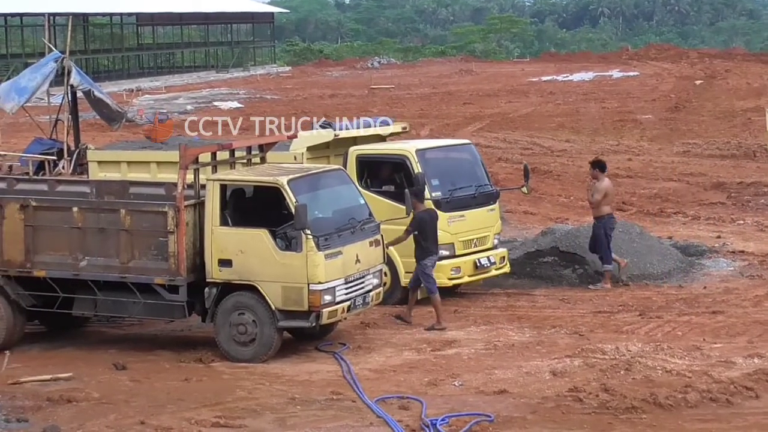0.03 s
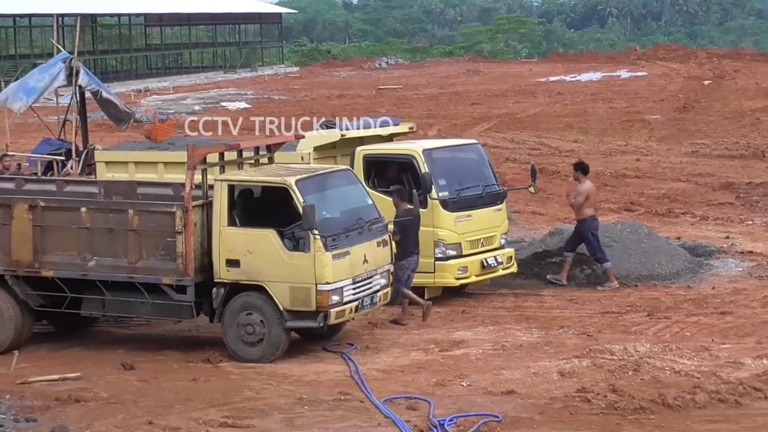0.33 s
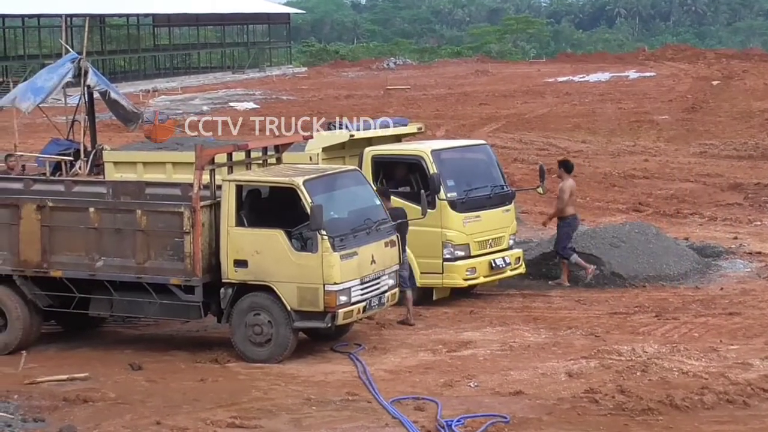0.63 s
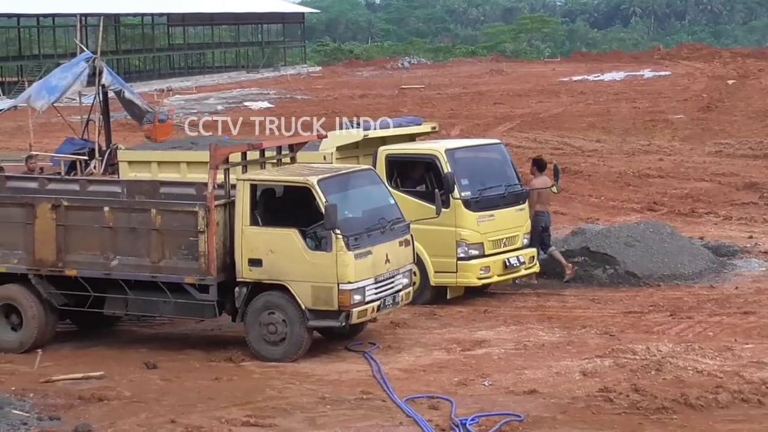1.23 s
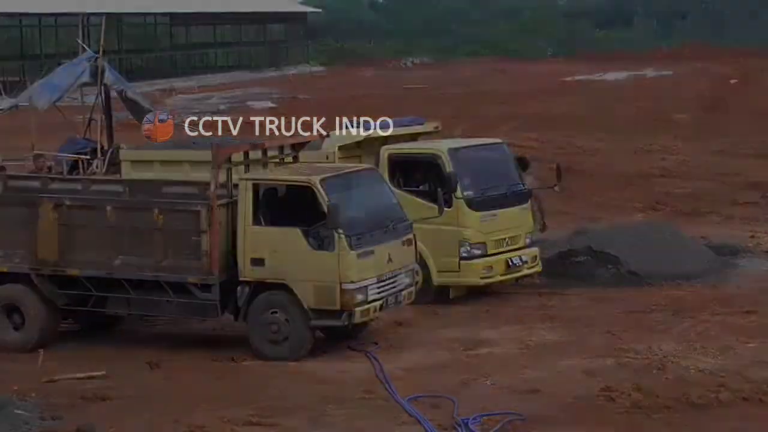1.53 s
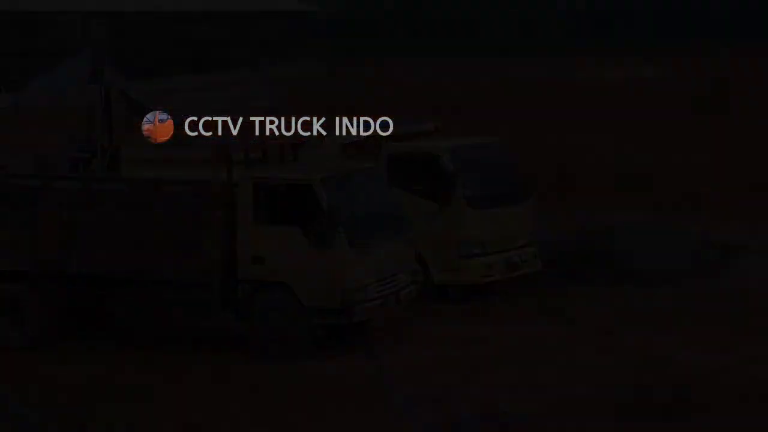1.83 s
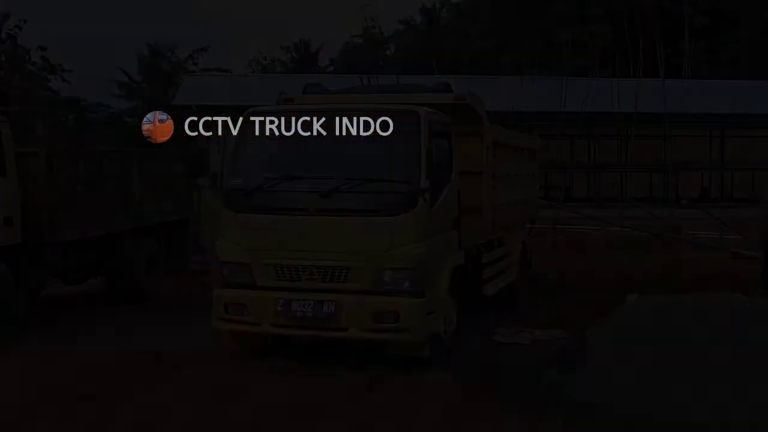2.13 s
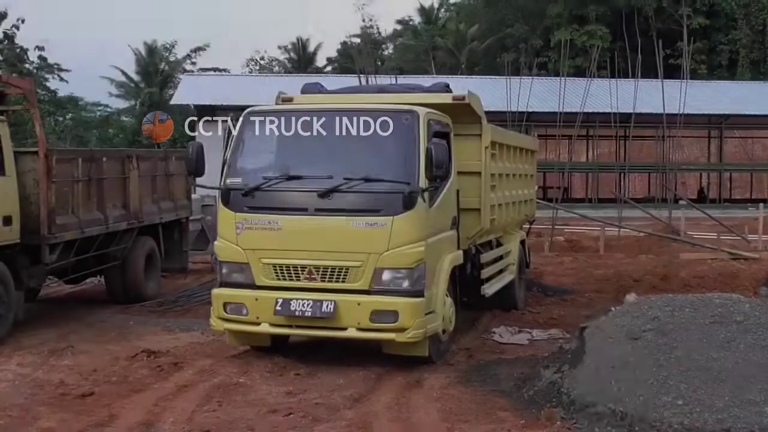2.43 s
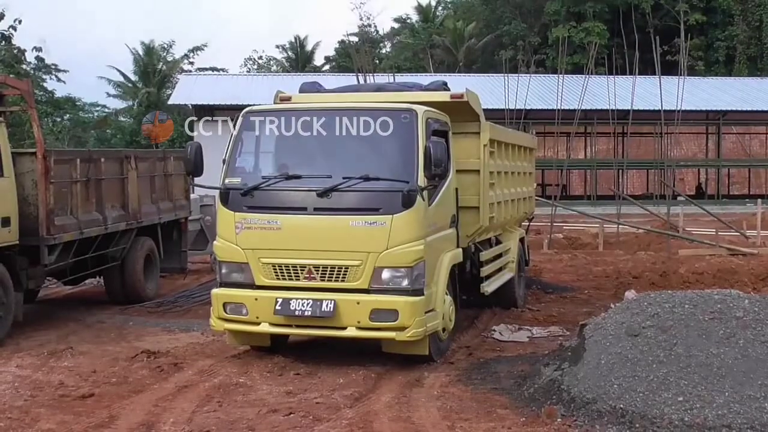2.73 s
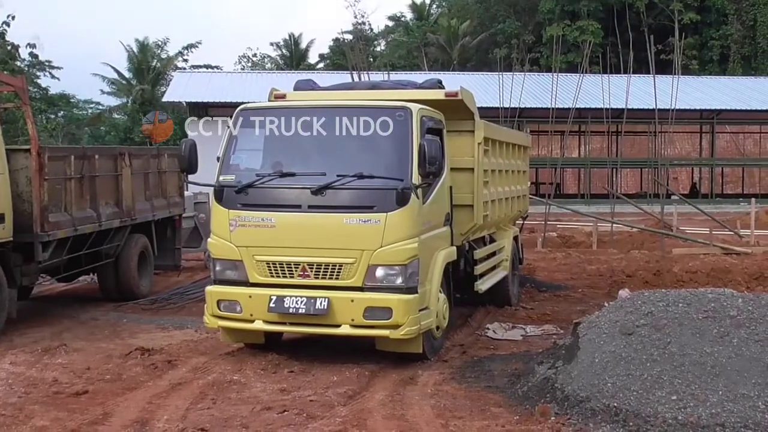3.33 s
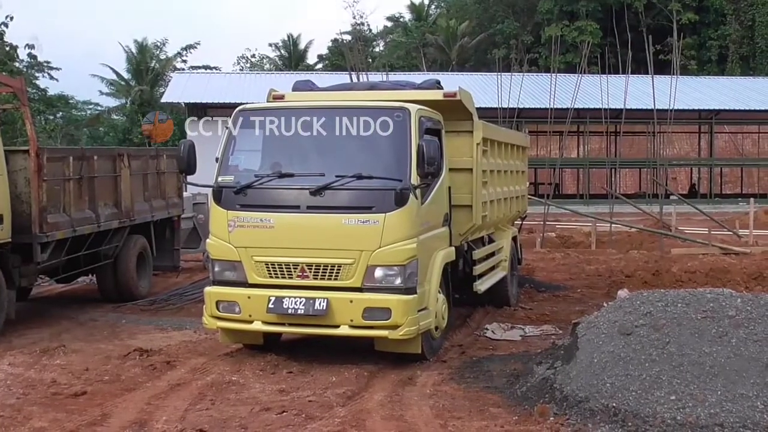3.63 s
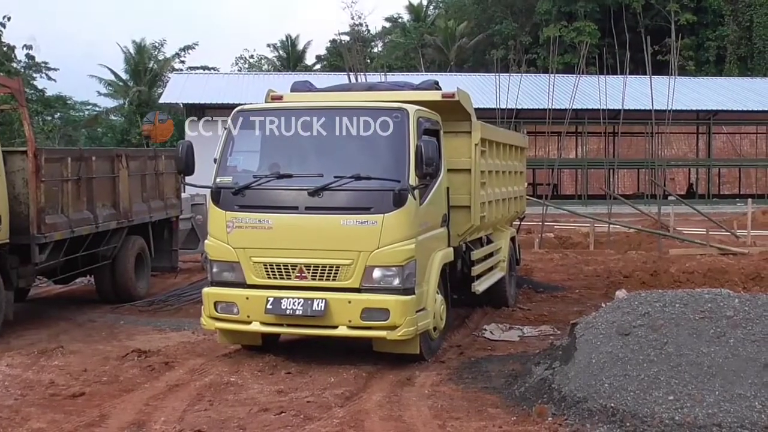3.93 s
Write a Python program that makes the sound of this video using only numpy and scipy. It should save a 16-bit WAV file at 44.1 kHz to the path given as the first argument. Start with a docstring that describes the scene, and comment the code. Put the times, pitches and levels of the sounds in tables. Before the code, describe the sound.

On a building site, a diesel truck rumbles slowly along with clanks from its tipper body and stops with high brake squeaks. A close, ticking idle takes over above another engine's hum, ending with two dull thuds and a faint whine.

```python
"""Dump trucks on a building site

A diesel truck creeps over rough ground: its exhaust booms, sags and recovers, the steel tipper body
knocks and booms, and the brakes squeak as it stops. It fades into a truck idling close by, each firing
a tick and a push of rumble, over the hum of a faster engine. Two dull thuds and a faint whine end it."""
import sys
import numpy as np
from scipy import signal
from scipy.fft import rfft, irfft
from scipy.io import wavfile

SR = 44100
rng = np.random.default_rng(int(sys.argv[2]) if len(sys.argv) > 2 else 0)


def generate_wav(signal):
    """Clip the signal to [-1, 1] and save it as 16-bit WAV at the path in sys.argv[1]."""
    frames = np.transpose(np.atleast_2d(signal))
    scaled = np.clip(frames, -1, 1) * 32767
    pcm = np.round(scaled).astype(np.int16)
    wavfile.write(sys.argv[1], SR, pcm)


N = 176400
T = np.arange(N) / SR
SIDES = np.array([[1], [-1]])  # left, right

# Exhaust boom, at twice the firing rate. Each row: time in seconds, pitch in Hz.
BOOM_PITCH = [(.12, 136.7), (.3, 121.4), (.45, 114.3), (.8, 108), (1.07, 115.1), (1.3, 123.5),
              (1.55, 133.7), (1.9, 136), (2.6, 142.6)]
# Its partials. Each row: multiple of the boom pitch, relative level in dB.
BOOM_ORDERS = [(.5, -23), (1, -0.5), (1.5, -17.5), (2, -14.5), (2.5, -22.5), (3, -20)]
# Fader rides for the creeping truck. Each row: time in seconds, gain in dB.
BOOM_LEVEL = [(0, -19), (.24, -20), (.33, -29.5), (.98, -35.5), (1.07, -22.5), (1.21, -29.5), (1.3, -21),
              (1.65, -21), (1.73, -31), (1.88, -24.5), (2.12, -27.5), (2.35, -35.5), (2.62, -32),
              (2.85, -34.5)]
BODY_LEVEL = [(0, -24.5), (.3, -24), (.8, -21.5), (1.5, -23.5), (1.68, -25.5), (1.73, -29), (2.3, -35)]
CLATTER_LEVEL = [(0, -31), (.5, -27), (.95, -27.5), (1.17, -23), (1.32, -28.5), (1.45, -24.5),
                 (1.68, -27.5), (1.73, -30.5), (2.3, -35)]
HISS_LEVEL = [(0, -40), (.35, -40), (.6, -35), (1.0, -39.5), (1.65, -38), (1.75, -43), (2.3, -46)]
CHASSIS_LEVEL = [(0, -46), (.55, -38), (.85, -28), (1.5, -31), (1.8, -48)]
CREEP_NOISE_FADE = [(2.2, -8.5), (2.5, -10), (2.9, -11)]  # rides all four noise layers
# Colours of those layers. Each row: frequency in Hz, relative noise density in dB.
BODY_COLOUR = [(150, 1.5), (250, -5.5), (345, 0), (450, -8.5), (600, -15)]
CLATTER_COLOUR = [(500, -5), (600, -9), (700, -2.5), (790, 0.5), (1000, -2.5), (1130, -7), (1450, -9),
                  (1710, -21.5), (2200, -18), (3000, -27)]
HISS_COLOUR = [(1500, 7.5), (2400, -2.5), (4000, 3.5), (5500, -2.5), (7000, 1.5), (11000, -1.5),
               (14000, -6)]
CHASSIS_COLOUR = [(35, -38), (55, 6.5), (75, -32), (110, -3), (160, -11.5)]
# Stereo width of each truck. Each row: frequency in Hz, left-right likeness (1 is mono).
CREEP_LIKENESS = [(380, 0.86), (940, 0.58), (5000, 0.053), (8000, -0.25), (13000, -0.057)]
IDLE_LIKENESS = [(300, 0.98), (940, 0.9), (5870, 0.83), (14000, 0.23)]
# Placement of each truck. Each row: frequency in Hz, left minus right in dB.
CREEP_PAN = [(150, 1), (1000, -3.5), (4000, -4), (8000, 0), (13000, -2)]
IDLE_PAN = [(60, 1), (10000, 0.5)]

# Knocks of the tipper body. Each row: start in seconds, clank level in dB, thump level in dB.
KNOCKS = [(0.36, -37, -21), (0.42, -36.5, -25), (0.446, -48, -24.5), (0.535, -24, -22.5),
          (0.656, -26.5, -25), (0.694, -43, -26.5), (0.788, -39, -24), (0.855, -35.5, -25.5),
          (1.396, -40, -24), (1.46, -36, -25.5)]
# Its ringing steel. Each row: frequency in Hz, relative level in dB.
STEEL_MODES = [(1420, -5), (2380, -17), (2800, -9.5), (4200, -12.5)]
# Colours of the knocks and the hiss swell. Each row: frequency in Hz, relative noise density in dB.
CLANK_COLOUR = [(500, -29), (1400, -1), (2000, 1.5), (2700, -2), (3400, 5), (4200, -1), (5500, -3.5),
                (9000, -2), (14000, -9)]
THUMP_COLOUR = [(100, -1.5), (180, -11), (350, 5.5), (600, -8.5), (1000, -11.5), (1800, -20.5)]
SWELL_COLOUR = [(6500, -5), (8000, 5.5), (11500, -5)]
# Hollow booms of the shaken body. Each row: peak time in seconds, pitch in Hz, level in dB.
BODY_BOOMS = [(0.379, 348.5, -24), (0.581, 440, -24.5), (.735, 159.7, -21), (.955, 364.2, -21),
              (1.045, 321.2, -24), (1.17, 330.7, -26), (3.09, 164.4, -22.5), (3.16, 215, -29)]
# Hits on a loose steel part. Each row: start in seconds, level in dB.
PINGS = [(.422, -44.5), (0.692, -43), (.868, -46.5)]
# Spurts of brake squeak. Each row: start in seconds, length in seconds, level in dB.
SQUEAKS = [(1.292, 0.075, -45), (1.33, 0.083, -33), (1.411, 0.078, -36.5), (1.493, 0.09, -35),
           (1.64, 0.029, -41), (1.713, 0.13, -32), (1.864, 0.051, -46), (1.943, 0.081, -39.5),
           (2.066, 0.052, -42), (2.185, .045, -46), (2.26, 0.11, -46), (2.39, 0.081, -55), (2.5, .2, -67)]
# Higher brake modes. Each row: start in seconds, seconds to fall 15 dB, pitch in Hz, level in dB.
CHIRPS = [(1.85, 0.17, 9400, -44), (2.0, 0.16, 11650, -55)]

# Fade-in of the idling truck and the hum. Each row: time in seconds, gain in dB.
IDLE_FADE = [(1.6, -24.5), (2.0, -10), (2.4, -7.5), (2.75, -3.5), (3.05, -1.5), (4, -1.5)]
# Colours of the idle and the thuds. Each row: frequency in Hz, relative noise density in dB.
IDLE_RUMBLE_COLOUR = [(30, -34), (59, -7), (104, -10), (160, -6.5), (225, -2.5), (292, -5), (456, -24),
                      (730, -13.5), (1050, -27.5), (1410, -30), (2300, -57)]
TICK_COLOUR = [(1200, 4.5), (2300, 3.5), (3000, -3), (4000, 2), (5700, -8.5), (8500, 0.5), (11500, -5.5),
               (14000, -9.5)]
THUD_COLOUR = [(130, -2), (400, 2.5), (800, 3.5), (1400, -5.5), (2200, -22.5), (5000, -32), (8500, -27),
               (14000, -37)]
# Ring of the engine block. Each row: frequency in Hz, relative level in dB.
BLOCK_MODES, BLOCK_WIDTH_HZ = [(3400, -13), (4450, -13)], 36
# Tones of the faster engine. Each row: pitch in Hz, level in dB before the fade.
HUM_TONES = [(73.6, -32), (142.5, -27.5), (185, -33.5), (221, -29), (244, -34)]
# Dull blows. Each row: start in seconds, level in dB.
THUDS = [(3.012, -23.5), (3.714, -32.5)]
# Path of the whine. Each row: time in seconds, pitch in Hz, level in dB.
WHINE = [(3.3, 480, -68.5), (3.43, 492, -39), (3.6, 540, -34.5), (3.75, 570, -60)]


def from_db(db):
    """Decibels to gain."""
    return 10 ** (np.asarray(db) / 20)


def rms_one(x):
    """Scale to unit power."""
    return x / np.sqrt(np.mean(x ** 2) + 1e-20)


def in_time(rows, column=1):
    """One column of a curve at every sample."""
    rows = np.array(rows)
    return np.interp(T, rows[:, 0], rows[:, column])


def at_hz(points, hz):
    """Read a table on a log-frequency axis."""
    points = np.array(points)
    return np.interp(np.log(hz), np.log(points[:, 0]), points[:, 1])


def drift(rate_hz):
    """Smooth random wander of spread 1."""
    step, settle = 40, 2000
    pole = np.exp(-2 * np.pi * step * rate_hz / SR)
    white = rng.standard_normal(N // step + settle + 2)
    slow = signal.lfilter([1], [1, -2 * pole, pole * pole], white)[settle:]
    return np.interp(np.arange(N) / step, np.arange(len(slow)), rms_one(slow))


def noise(colour, likeness, pan):
    """Stereo noise of a given colour, width and direction, falling steeply beyond its ends."""
    hz = np.maximum(np.arange(N // 2 + 1) * SR / N, 1)
    skirts = 1 / np.sqrt((1 + (.8 * colour[0][0] / hz) ** 10) * (1 + (.8 * hz / colour[-1][0]) ** 10))
    alike = np.clip(at_hz(likeness, hz), -1, 1)
    mid, side = rfft(rng.standard_normal((2, N)))
    stereo = np.sqrt(1 + alike) * mid + SIDES * np.sqrt(1 - alike) * side
    eq = skirts * from_db(at_hz(colour, hz) + SIDES * at_hz(pan, hz) / 2)
    return rms_one(irfft(stereo * eq, N))


def blow(start, attack_s, t60_s):
    """Envelope of one hit: a quick rise, then a steady decay."""
    age = T - start
    return np.clip(age / attack_s, 0, 1) * from_db(-60 * np.clip((age - attack_s) / t60_s, 0, 3))


def swell(centre_s, width_s):
    """A bell-shaped rise and fall."""
    return np.exp(-.5 * ((T - centre_s) / width_s) ** 2)


def phase_of(hz):
    """Running phase of a changing frequency, from a random start."""
    return 2 * np.pi * (np.cumsum(hz) / SR + rng.random())


def ringing(hz, width_hz):
    """A narrow resonance shaken at random, separately in each ear."""
    phase = 2 * np.pi * hz * T
    ears = [drift(width_hz) * np.cos(phase) + drift(width_hz) * np.sin(phase) for _ in range(2)]
    return rms_one(np.array(ears))


def exhaust_boom(pitch):
    """Exhaust partials follow engine speed, and from 1.87 s the boom throbs ever more slowly."""
    boom = 0
    for order, db in BOOM_ORDERS:
        gain = from_db(db + 1.44 * drift(18))
        roughness = 1 + 0.00795 * order * drift(60.6)  # higher partials are more ragged
        boom += gain * np.sin(phase_of(order * pitch * roughness))
    throb_from_s, throb_hz, slowing_hz_per_s = 1.87, 8, 3.7
    age = T - throb_from_s
    cycles = throb_hz * age - slowing_hz_per_s * age ** 2 / 2
    depth = 0.42 * np.clip(2 * cycles + 1, 0, 1) * np.clip(2 - age, 0, 1)
    throb = 1 + depth * np.cos(2 * np.pi * cycles)
    return np.sqrt(2) * from_db(in_time(BOOM_LEVEL)) * throb * boom


def creeping_truck():
    """Under the exhaust, body rumble, clatter and hiss pulse with the firings; the chassis adds sub."""
    pitch = in_time(BOOM_PITCH) * (1 + 0.00754 * drift(16))
    boom = exhaust_boom(pitch)
    firing = rms_one(1 + 0.089 * np.cos(phase_of(pitch / 2)) * from_db(2 * drift(38)))
    layers = [(BODY_COLOUR, in_time(BODY_LEVEL) + 5.5, firing),
              (CLATTER_COLOUR, in_time(CLATTER_LEVEL) + 5, firing),
              (HISS_COLOUR, in_time(HISS_LEVEL) + 3.5, np.sqrt(np.abs(firing))),
              (CHASSIS_COLOUR, in_time(CHASSIS_LEVEL), 1)]
    bed = sum(noise(colour, CREEP_LIKENESS, CREEP_PAN) * from_db(db) * pulse
              for colour, db, pulse in layers)
    return boom + bed * from_db(in_time(CREEP_NOISE_FADE))


def tipper_knocks():
    """Loose steel meets steel: a bright ringing clank over a duller thump."""
    clank = noise(CLANK_COLOUR, CREEP_LIKENESS, CREEP_PAN)
    clank += sum(from_db(db) * ringing(hz, width_hz=64) for hz, db in STEEL_MODES)
    thump = noise(THUMP_COLOUR, CREEP_LIKENESS, CREEP_PAN)
    clank *= sum(from_db(db) * blow(start, attack_s=0.0041, t60_s=0.12) for start, db, _ in KNOCKS)
    thump *= sum(from_db(db) * blow(start, attack_s=0.0041, t60_s=0.3) for start, _, db in KNOCKS)
    return clank + thump


def body_booms():
    """The empty body booms when shaken; low notes last longer."""
    width_cycles, spread_hz = 6.6, 16.13
    booms = 0
    for peak, hz, db in BODY_BOOMS:
        tone = np.sin(phase_of(hz + spread_hz * drift(26.5)))
        booms += from_db(db) * swell(peak, width_cycles / hz) * tone
    return np.sqrt(2) * booms


def steel_pings():
    """A small loose part is struck and rings on one high note."""
    ping_hz = 4520
    hits = sum(from_db(db) * blow(start, attack_s=.004, t60_s=0.094) for start, db in PINGS)
    return np.sqrt(2) * np.sin(phase_of(np.full(N, ping_hz))) * hits


def hiss_swell():
    """A brief, soft breath of high hiss."""
    envelope = from_db(-45) * swell(centre_s=1.171, width_s=0.087)
    return envelope * noise(SWELL_COLOUR, CREEP_LIKENESS, CREEP_PAN)


def brakes():
    """The drum sings on one note in spurts, and briefly chirps in higher modes."""
    squeak_hz, wobble_hz, attack_s, t60_s = 4791, 6.6, 0.025, 0.2
    flutter_db, octave_db, pan_db, lag_rad = 1.1, -23, -3, -1.77
    ear_shift = SIDES / 2 * lag_rad
    phase = phase_of(squeak_hz + wobble_hz * drift(29.14))
    tone = np.sin(phase + ear_shift) + from_db(octave_db) * np.sin(2 * phase + ear_shift)
    spurts = []
    for start, length, db in SQUEAKS:
        rise = np.clip((T - start) / attack_s, 0, 1) ** 2
        spurts.append(rise * from_db(db - 60 * np.maximum(T - start - length, 0) / t60_s))
    rubbing = np.max(spurts, axis=0) * from_db(flutter_db * drift(33) + SIDES / 2 * pan_db)
    chirps = sum(from_db(db) * ringing(hz, width_hz=110) * blow(start, attack_s=0.013, t60_s=4 * fall)
                 for start, fall, hz, db in CHIRPS)
    return np.sqrt(2) * rubbing * tone + chirps


def idling_truck():
    """Every firing gives a burst of injector ticking and a push of rumble."""
    firing_hz, tick_db, floor_db, rumble_db = 17.34, -42, -51, -24
    accent_hz, accent_db, accent_at_s = 6.1, 3, 2.70  # the clatter swells and eases
    times = np.arange(.0365, N / SR, 1 / firing_hz)
    accents = accent_db * np.cos(2 * np.pi * accent_hz * (times - accent_at_s))
    strengths = from_db(accents + rng.normal(0, .5, len(times)))
    firing = sum(gain * blow(start, attack_s=0.0064, t60_s=0.14) for start, gain in zip(times, strengths))
    metal = noise(TICK_COLOUR, IDLE_LIKENESS, IDLE_PAN)
    metal += sum(from_db(db) * ringing(hz, BLOCK_WIDTH_HZ) for hz, db in BLOCK_MODES)
    rattle = rms_one(from_db(1.5 * drift(300)))  # each tick is a short rattle of sharp contacts
    ticks = metal * np.hypot(from_db(tick_db) * firing * rattle, from_db(floor_db))
    push = rms_one(1 + 0.2 * firing)
    return ticks + from_db(rumble_db) * push * noise(IDLE_RUMBLE_COLOUR, IDLE_LIKENESS, IDLE_PAN)


def engine_hum():
    """Wavering low tones of a faster engine."""
    flutter_db, waver_hz = 1, 1.6
    tones = [from_db(db + flutter_db * drift(30)) * np.sin(phase_of(hz + waver_hz * drift(5.97)))
             for hz, db in HUM_TONES]
    return np.sqrt(2) * sum(tones)


def thuds():
    """Dull blows on a truck body."""
    hits = sum(from_db(db) * blow(start, attack_s=0.026, t60_s=0.45) for start, db in THUDS)
    return noise(THUD_COLOUR, IDLE_LIKENESS, IDLE_PAN) * hits


def whine():
    """A faint, unsteady rising tone."""
    gate = (T > WHINE[0][0]) * (T < WHINE[-1][0])
    pitch = in_time(WHINE) + 8 * drift(29.7)
    return gate * from_db(in_time(WHINE, column=2)) * np.sin(phase_of(pitch))


def scene():
    """The creeping truck gives way to the idling one."""
    idle = (idling_truck() + engine_hum()) * from_db(in_time(IDLE_FADE))
    creep = creeping_truck() + tipper_knocks() + steel_pings() + body_booms() + hiss_swell() + brakes()
    return creep + idle + thuds() + whine()


def record(dry):
    """A steep low-pass takes off the very top."""
    cutoff_hz = 14100
    return signal.sosfilt(signal.ellip(10, .2, 80, cutoff_hz, fs=SR, output="sos"), dry)


dry = scene()
out = record(dry)
generate_wav(out)
```